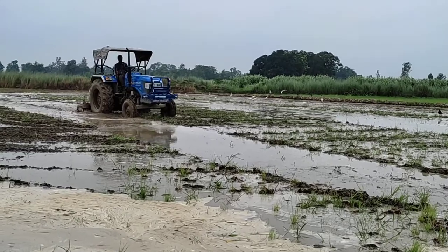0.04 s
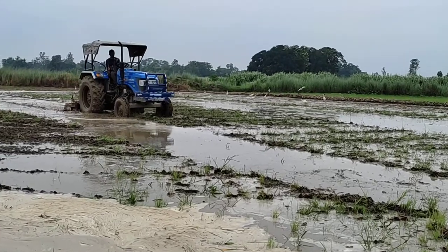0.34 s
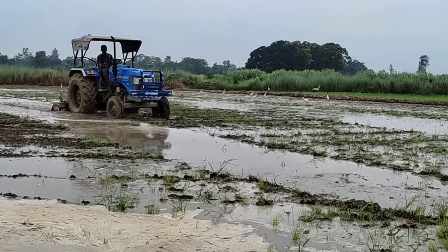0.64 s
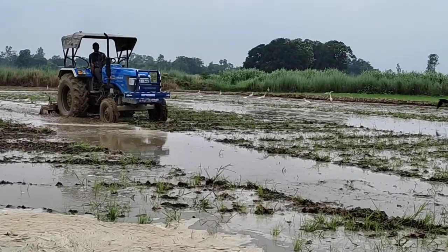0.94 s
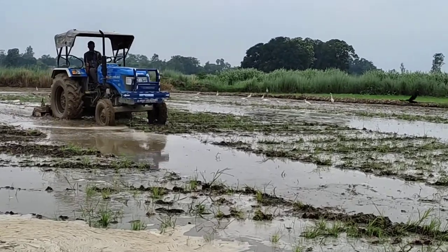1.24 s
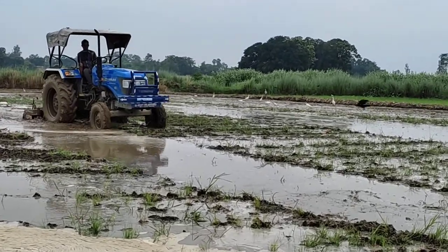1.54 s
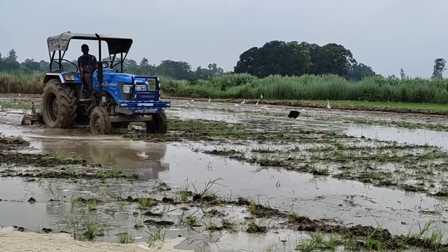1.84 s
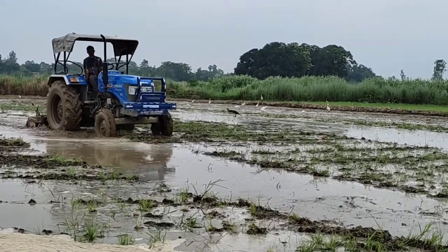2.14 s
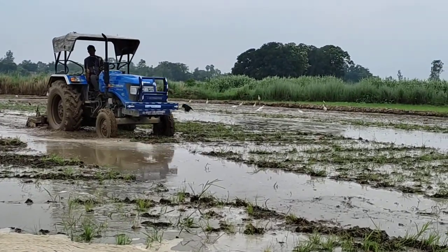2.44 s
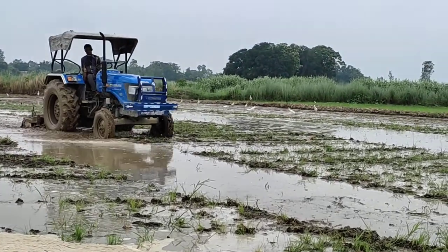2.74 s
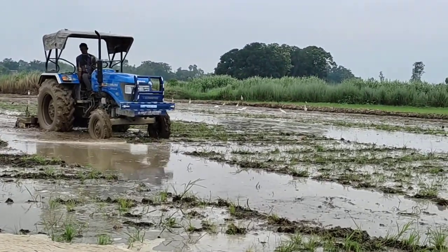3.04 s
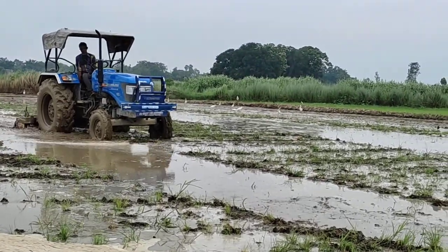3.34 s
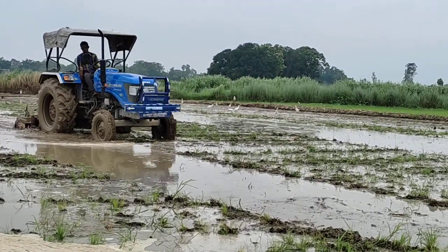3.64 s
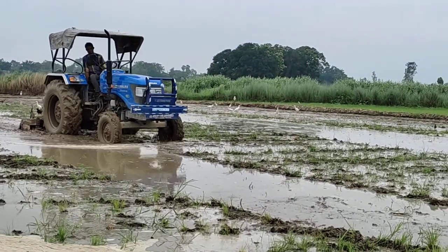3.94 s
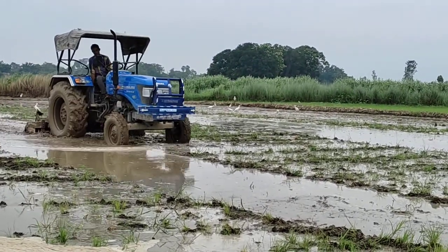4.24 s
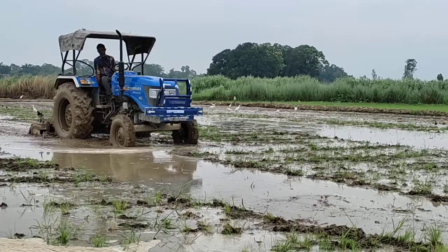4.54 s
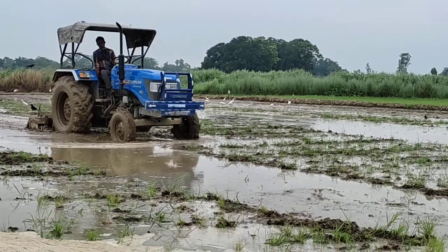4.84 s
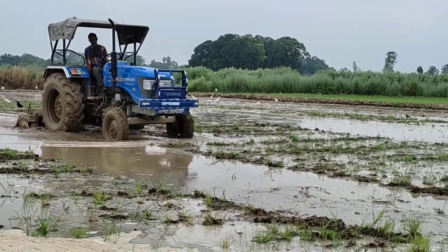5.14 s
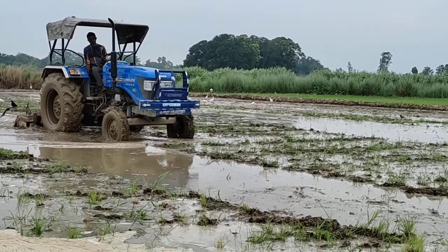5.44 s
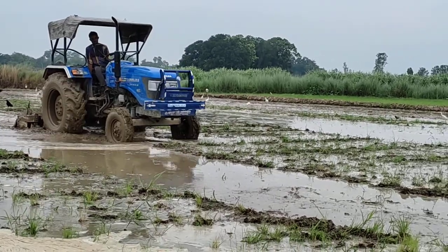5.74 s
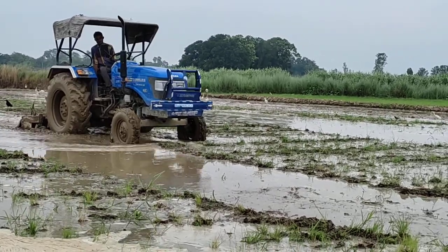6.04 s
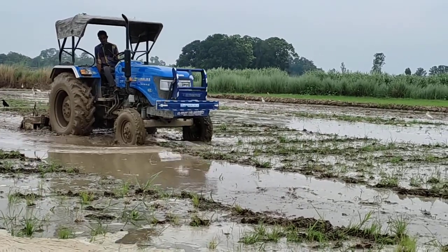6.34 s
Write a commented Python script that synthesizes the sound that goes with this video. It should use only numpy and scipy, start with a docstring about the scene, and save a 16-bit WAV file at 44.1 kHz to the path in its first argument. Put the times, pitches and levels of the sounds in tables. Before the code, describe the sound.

A diesel tractor runs under load from the first moment to the end, about six and a half seconds, heard outdoors across a flooded field. A rapid, low exhaust chug is the main sound, joined by a hollow knock, bright metallic clatter, a faint fan hum and a thin ticking hiss. The engine speed holds nearly steady, wavering a little as the mud drags. The clatter eases briefly near 0.9, 2 and 5.8 seconds, then picks up again. Short gear clanks come irregularly, clustered in the first second or so and around 2.4 seconds, with firmer ones near 3.1, 3.6 and 4.4 seconds and a few more toward the end. Underneath, the wheels and tiller churn mud and water in a soft, gently swelling wash. The whole sound grows slightly louder as the tractor slowly comes closer.

```python
"""A chugging, clattering three-cylinder diesel: a tractor drags a tiller through a flooded field.
Every firing gives a thud from the exhaust stack, a knock in the block and a spit of injector hiss.
The driveline clanks under load, the cooling fan hums, and churned mud and water wash underneath.
An echo off the standing water colours the clatter, shifting as the tractor slowly comes nearer."""
import sys
import numpy as np
from scipy import signal
from scipy.fft import rfft, irfft, next_fast_len
from scipy.io import wavfile
from scipy.ndimage import uniform_filter1d

SR = 44100
rng = np.random.default_rng(int(sys.argv[2]) if len(sys.argv) > 2 else 0)


def file_out(sig):
    """Save sig as 16-bit WAV at sys.argv[1]."""
    # one column per channel
    cols = np.atleast_2d(sig).T
    # limit, then scale
    lim = np.clip(cols, -1, 1)
    pcm = np.round(lim * 32767).astype(np.int16)
    wavfile.write(sys.argv[1], SR, pcm)


N = 289737

# The engine hunts with the load. Each row: time in seconds, firings per second.
ENGINE_SPEED = [(0.0, 37.487), (0.31, 37.116), (0.76, 39.774), (0.9, 38.849), (1.54, 38.898),
                (1.88, 40.015), (2.11, 38.217), (2.54, 39.079), (2.64, 38.528), (3.15, 39.088),
                (3.26, 38.707), (4.0, 39.846), (4.44, 37.803), (4.79, 39.564), (5.31, 38.143),
                (5.77, 39.789), (5.89, 38.875), (6.57, 39.077)]
# The governor's answer to the drag of the mud. Each row: time in seconds, fuel in dB about its norm.
FUEL_CURVE = [(0.0, 2.7), (0.69, 2.2), (0.88, -4), (1.09, 1), (1.64, 1.1), (1.99, -3), (2.25, 3.5),
              (2.73, 1), (3.09, 1.3), (4.09, -2), (4.48, 3), (4.93, 0), (5.36, 3), (5.69, 1.4),
              (5.81, -6.5), (6.08, 2.5), (6.45, -1.5), (6.57, 0.2)]
# The limp in the beat. Each entry: one cylinder's strength in dB.
CYLINDER_ACCENTS = [1.3, 3.1, 1.3]
# Exhaust note; thirds come from unequal cylinders. Each row: multiple of the firing rate, relative dB.
EXHAUST_ORDERS = [(1, -31), (5 / 3, -25.5), (2, -3), (8 / 3, -16), (3, -0.043), (4, -8.5), (14 / 3, -32.5),
                  (5, -17), (17 / 3, -33.5), (6, -32), (7, -27.5), (8, -40), (29 / 3, -28.5)]
# Fan hum. Each row: multiple of the blade rate, level in dB.
FAN_TONES = [(2, -40.5), (3, -37)]
# Colours of the gas rumble and the muddy wash. Each row: frequency in Hz, relative density in dB.
RUMBLE_COLOUR = [(20, -47), (40, -40), (62, 0.5), (100, 1), (150, 3), (210, 3), (270, -5), (340, -12.5),
                 (600, -36.5), (1500, -60.5)]
WASH_COLOUR = [(20, -34), (50, -8), (200, 4), (340, -12), (600, 3.5), (950, -14.5), (1400, -1.5),
               (2000, -5), (2800, -13), (3400, -25), (4200, -36.5), (6500, -22), (8000, -34.5)]
# How each metal part rings. Each row: pitch in Hz, width in Hz, relative level in dB.
SUMP_MODES = [(405, 16, -15.5), (456, 44, 1.5), (491, 70, -9), (703, 150, -5.5), (770, 110, -8.5),
              (813, 87, -19.5)]
BLOCK_MODES = [(1354, 120, -4.5), (1572, 50, 2), (1680, 66, 2.5), (1761, 42, 0.5), (1857, 140, -14.5)]
HEAD_MODES = [(2246, 130, -6), (2268, 39, 2), (2342, 100, 3)]
COVER_MODES = [(2707, 90, 3.5), (2997, 260, 0), (3138, 120, -3), (3370, 100, -33)]
DRIVELINE_MODES = [(1095, 21, -5.5), (1124, 40, 13), (1191, 55, 7.5), (1207, 61, -11)]
INJECTOR_MODES = [(4120, 180, -13.5), (4950, 180, -8), (5470, 560, -5), (5980, 210, -3), (6360, 550, 1.5),
                  (6810, 330, -6), (7250, 360, -26)]
# Hard clanks. Each row: time in seconds, level in dB, share of block ring in dB, both before trim.
CLANK_CUES = [(0.2119, -14, -7), (0.3172, -14, -11), (0.3706, -17, -1), (0.5057, -18, -1),
              (0.5284, -12, -4), (0.9901, -14, -6), (1.1453, -14, -9), (1.2241, -14, -12),
              (2.2992, -13, -13), (2.3765, -12, -13), (2.4274, -14, -10), (2.4798, -14, -13),
              (3.0764, -8, -18), (3.1208, -15, -12), (3.3034, -14, -14), (3.3563, -13, -12),
              (3.6122, -9, -20), (4.376, -10, -21), (4.6623, -14, -15), (4.7376, -14, -15),
              (5.3577, -11, -17), (5.6905, -14, -13), (6.0487, -13, -10), (6.5344, -12, -6)]
# The mix, before trims. Each fader: starting level in dB, change in dB per second, dB per dB of fuel.
EXHAUST_FADER = (-18, 0.19, .08)
SUMP_FADER = (-27.5, 0.3, .08)
BLOCK_FADER = (-30.5, -.04, .25)
HEAD_FADER = (-40, 0.74, .15)
COVER_FADER = (-41.5, 0.03, .35)
DRIVELINE_FADER = (-29, .08, 0.52)

START_DISTANCE_M, APPROACH_M_PER_S = 17.0, .913
ENGINE_HEIGHT_M, EAR_HEIGHT_M, SOUND_M_PER_S = 1.15, 1.7, 343


def from_db(db):
    """Decibels to gain."""
    return 10 ** (np.asarray(db) / 20)


def rms_one(x):
    """Scale to rms 1."""
    return x / np.sqrt(np.mean(x ** 2) + 1e-20)


def in_time(curve):
    """A curve's value at every sample."""
    return np.interp(np.arange(N) / SR, *np.transpose(curve))


def ride(fader, fuel_db, trim_db=0):
    """Gain of one part: a steady slope in dB, swinging with the fuel."""
    start_db, db_per_s, per_fuel = fader
    return from_db(start_db + db_per_s * np.arange(N) / SR + per_fuel * fuel_db + trim_db)


def drift(rate_hz):
    """A smooth random wander of spread 1, mostly slower than rate_hz."""
    step, run_in = 40, 2000
    pole = np.exp(-2 * np.pi * rate_hz * step / SR)
    white = rng.standard_normal(N // step + run_in + 2)
    slow = signal.lfilter([1], [1, -2 * pole, pole * pole], white)[run_in:]
    return np.interp(np.arange(N) / step, np.arange(len(slow)), rms_one(slow))


def noise(colour):
    """Steady noise of a given colour, rms 1."""
    hz, db = np.transpose(colour)
    size = next_fast_len(N)
    bins = np.maximum(np.fft.rfftfreq(size, 1 / SR), 1)
    gain = from_db(np.interp(np.log(bins), np.log(hz), db))
    return rms_one(irfft(rfft(rng.standard_normal(size)) * gain, size)[:N])


def body(force, modes):
    """A metal part rings at its resonances and radiates little outside their range."""
    ring = 0
    for hz, width, db in modes:
        r = np.exp(-np.pi * width / SR)
        poles = [1, -2 * r * np.cos(2 * np.pi * hz / SR), r * r]
        ring = ring + from_db(db) * (1 - r * r) / 2 * signal.lfilter([1, 0, -1], poles, force + 1e-18)
    edges = [modes[0][0] * .85, modes[-1][0] * 1.08]
    return signal.sosfilt(signal.butter(3, edges, "band", fs=SR, output="sos"), ring)


def bursts(firing, delay, rise, decay, scatter_db, floor):
    """One accented swell per firing over a steady floor, rms 1; times are in firing periods."""
    index, age = np.divmod(firing - delay + 1, 1)
    index = index.astype(int)
    accent_db = np.array(CYLINDER_ACCENTS)[(index - 1) % 3]
    strength = from_db(accent_db + scatter_db * rng.standard_normal(400)[index])
    shape = (1 - np.exp(-(age / rise) ** 2)) * np.exp(-age / decay)
    return rms_one(strength * shape / shape.max() + floor)


def blows(firing, delay, jitter, scatter_db):
    """One sharp hit per firing, loose in timing and weight, rms 1; times are in firing periods."""
    count = np.arange(np.ceil(firing[0]), np.floor(firing[-1]))
    late, strong = rng.standard_normal((len(count), 2)).T
    at = np.interp(count + delay + jitter * late, firing, np.arange(N)).astype(int)
    force = np.zeros(N)
    force[at] = from_db(np.array(CYLINDER_ACCENTS)[count.astype(int) % 3] + scatter_db * strong)
    return rms_one(force)


def impacts(per_s, spread_db):
    """A shower of tiny metal contacts of uneven size, rms 1."""
    sizes = from_db(spread_db * np.clip(rng.standard_normal(N), -2, 2)) * rng.choice([-1, 1], N)
    return rms_one(sizes * (rng.random(N) < per_s / SR))


def mud_wash(fuel_db, trim_db=-5, swell_db=1.0):
    """Wheels and tiller churn mud and water: a softly swelling bed that rides the sump's fader."""
    return ride(SUMP_FADER, fuel_db, trim_db + swell_db * drift(2.3)) * noise(WASH_COLOUR)


def over_water(sound, reflection=.29):
    """The water mirrors the engine; the echo lags more as it nears, so a comb of notches slides down."""
    sample = np.arange(N)
    distance = START_DISTANCE_M - APPROACH_M_PER_S * sample / SR
    direct = np.hypot(distance, EAR_HEIGHT_M - ENGINE_HEIGHT_M)
    mirrored = np.hypot(distance, EAR_HEIGHT_M + ENGINE_HEIGHT_M)
    lag = (mirrored - direct) / SOUND_M_PER_S * SR
    return sound + reflection * np.interp(sample - lag, sample, sound)


def injector_hiss(firing, fuel_db, level_db=-46):
    """Each injection spits and rings in the pipes; on little fuel the ticks sink into a sizzle."""
    spit = bursts(firing, delay=-.038, rise=.25, decay=.14, scatter_db=1.5, floor=.066)
    spray = (from_db(2 * fuel_db) * spit + .33) * rng.standard_normal(N)
    return from_db(level_db) * rms_one(body(spray, INJECTOR_MODES))


def fan_hum(firing, blades_per_firing=3.91, waver_db=3.0, wobble_cycles=.056):
    """Belt-driven blades hum, following the engine's speed but out of step with its beat."""
    blade = blades_per_firing * firing + wobble_cycles * drift(1.66)
    return sum(np.sqrt(2) * from_db(db + waver_db * drift(2.0)) * np.sin(2 * np.pi * multiple * blade)
               for multiple, db in FAN_TONES)


def top_end_clatter(firing, fuel_db, valves):
    """Combustion cracks and seating valves ring the head and its cover: the bright edge of the knock."""
    crack = bursts(firing, delay=-.023, rise=.062, decay=.2, scatter_db=2.0, floor=.051)
    stroke = crack * impacts(6000, spread_db=1.5)
    stroke += .28 * blows(firing, delay=.062, jitter=.046, scatter_db=3.0)
    churn = .74 * rng.standard_normal(N) + .26 * valves
    head = rms_one(body(from_db(.5 * fuel_db) * stroke + churn, HEAD_MODES))
    cover = rms_one(body(from_db(.44 * fuel_db) * stroke + .8 * churn, COVER_MODES))
    return ride(HEAD_FADER, fuel_db) * head + ride(COVER_FADER, fuel_db, trim_db=-1) * cover


def block_knock(firing, fuel_db, valves):
    """Combustion strikes the block; more fuel lifts each bang out of the churn of moving parts."""
    bang = bursts(firing, delay=-.071, rise=.18, decay=.14, scatter_db=2.0, floor=.081)
    shower = (from_db(.24 * fuel_db) * bang + .72) * impacts(5000, spread_db=2.5)
    strike = blows(firing, delay=.0645, jitter=.03, scatter_db=3.0)
    ring = rms_one(body(shower + .5 * strike + .46 * valves, BLOCK_MODES))
    return ride(BLOCK_FADER, fuel_db, trim_db=-2.2) * ring


def sump_slap(firing, fuel_db):
    """Each firing sends a long shower of contacts through sump and bonnet: the hollow low mids."""
    slap = bursts(firing, delay=-.17, rise=.035, decay=1.0, scatter_db=0, floor=.12)
    ring = rms_one(body(slap * impacts(4000, spread_db=1.0), SUMP_MODES))
    return ride(SUMP_FADER, fuel_db, trim_db=-1) * ring


def gear_rattle(firing, fuel_db):
    """Slack gears are knocked forward by each firing, chatter, and fall back later in the period."""
    drive = blows(firing, delay=.0973, jitter=.0471, scatter_db=1.7)
    shake = bursts(firing, delay=-.0097, rise=.14, decay=.23, scatter_db=2.5, floor=.2)
    chatter = shake * impacts(5000, spread_db=.5)
    rebound = blows(firing, delay=.64, jitter=.035, scatter_db=6.0)
    ring = rms_one(body(.5 * drive + chatter + .17 * rebound, DRIVELINE_MODES))
    # a soft limiter evens out the rattle's loudest swings
    swing = uniform_filter1d(ring ** 2, size=SR // 100)
    return ride(DRIVELINE_FADER, fuel_db) * rms_one(ring / np.sqrt(1 + .16 * swing))


def driveline_clanks(trim_db=-1.8, block_trim_db=4.5, build_s=.003, chatter_s=.014):
    """Now and then the driveline takes up its slack in one hard blow, and the teeth chatter out."""
    track = np.zeros(N)
    blow = signal.unit_impulse(SR // 10)
    age = np.arange(len(blow)) / SR
    build = 1 - np.exp(-age / build_s)
    ring, block = build * body(blow, DRIVELINE_MODES), build * body(blow, BLOCK_MODES)
    for start_s, db, share_db in CLANK_CUES:
        teeth = .035 * rng.standard_normal(len(blow)) * build * np.exp(-age / chatter_s)
        clank = (ring + body(teeth, DRIVELINE_MODES)) / np.abs(ring).max()
        clank += from_db(share_db + block_trim_db) * block / np.abs(block).max()
        at = round(start_s * SR) - np.argmax(np.abs(ring)) // 2
        track[at:at + len(clank)] += from_db(db + trim_db) * clank[:N - at]
    return track


def exhaust_thud(firing, speed, fuel_db, lag_periods=.179, waver_db=.35):
    """The orders meet in a suction dip just after the firing; the gas rumbles more as the engine lugs."""
    phase = 2 * np.pi * (firing - lag_periods)
    note = -sum(np.sqrt(2) * from_db(db + waver_db * drift(3.0)) * np.cos(order * phase)
                for order, db in EXHAUST_ORDERS)
    lugging = speed.mean() - speed
    rumble = from_db(-12 + 1.6 * lugging) * noise(RUMBLE_COLOUR)
    return ride(EXHAUST_FADER, fuel_db) * (note + rumble)


def scene():
    """Exhaust up front, machinery coloured by the water's echo, mud underneath; mono."""
    speed, fuel_db = in_time(ENGINE_SPEED), in_time(FUEL_CURVE)
    firing = 2.25 + np.cumsum(speed) / SR  # running count of firings: the engine's clock
    sump = sump_slap(firing, fuel_db)
    valves = blows(firing, delay=.45, jitter=.025, scatter_db=6.5)  # they seat between firings
    casing = sump + block_knock(firing, fuel_db, valves) + top_end_clatter(firing, fuel_db, valves)
    thud = exhaust_thud(firing, speed, fuel_db)
    gears = gear_rattle(firing, fuel_db) + driveline_clanks()
    hiss = injector_hiss(firing, fuel_db)
    wash = mud_wash(fuel_db)
    return (thud + over_water(fan_hum(firing) + casing + gears + hiss) + wash)[None]


def record(dry, cutoff_hz=7520):
    """A steep low-pass takes the air off the top."""
    return signal.sosfilt(signal.ellip(12, .2, 80, cutoff_hz, fs=SR, output="sos"), dry)


dry = scene()
out = record(dry)
file_out(out)
```